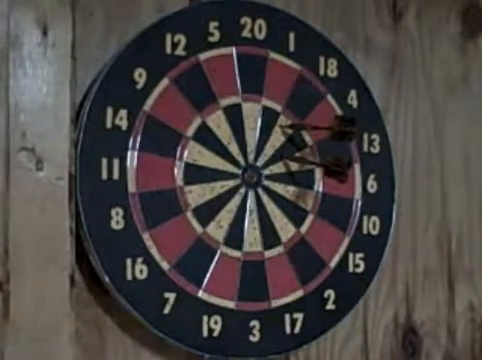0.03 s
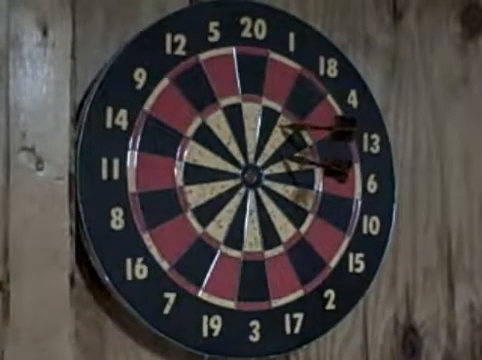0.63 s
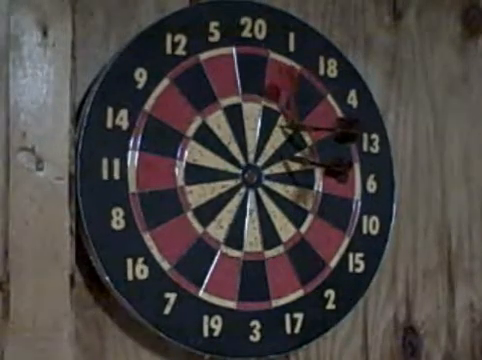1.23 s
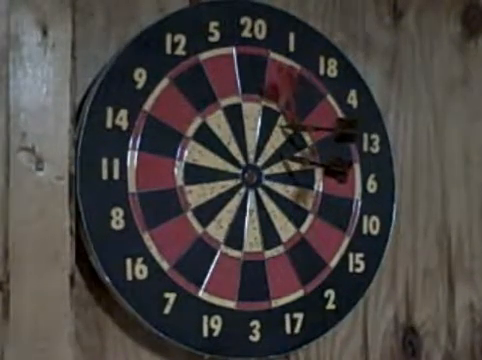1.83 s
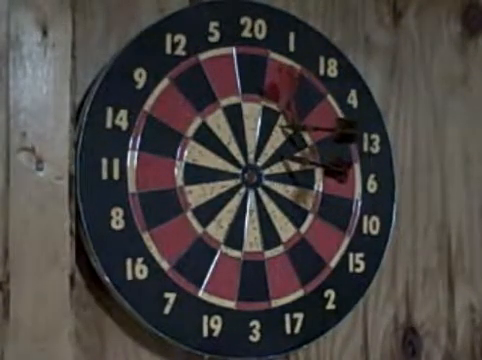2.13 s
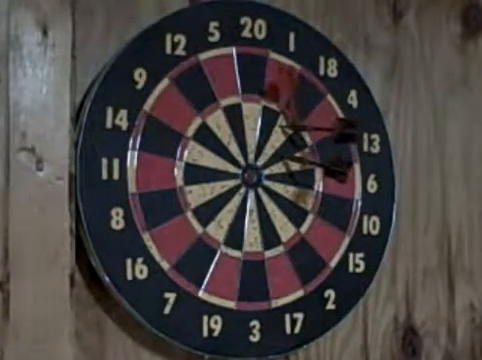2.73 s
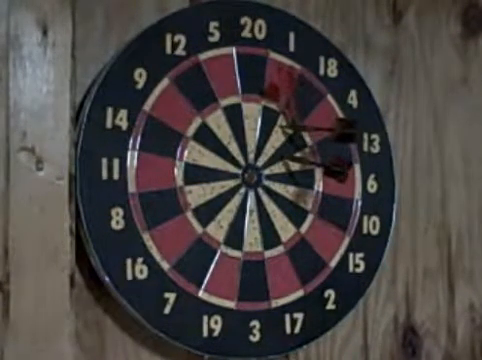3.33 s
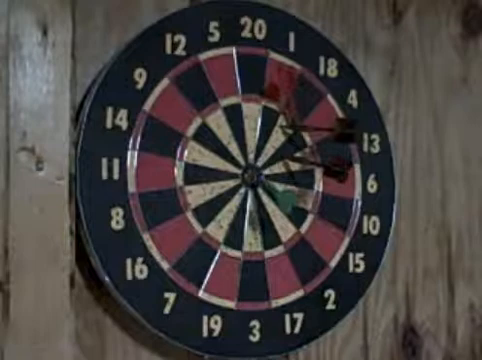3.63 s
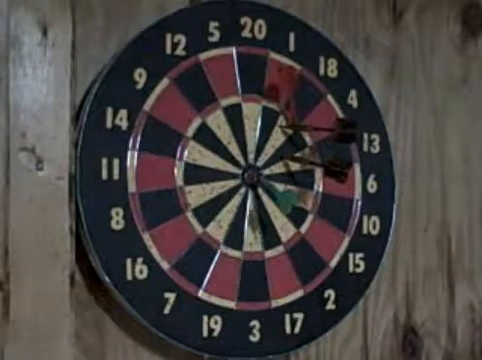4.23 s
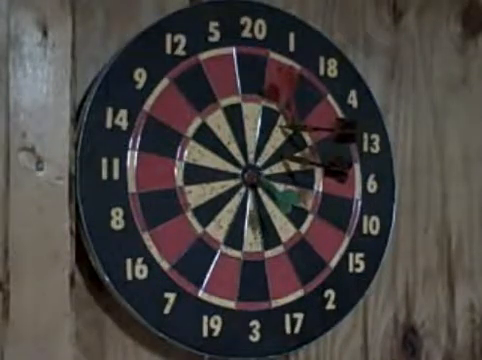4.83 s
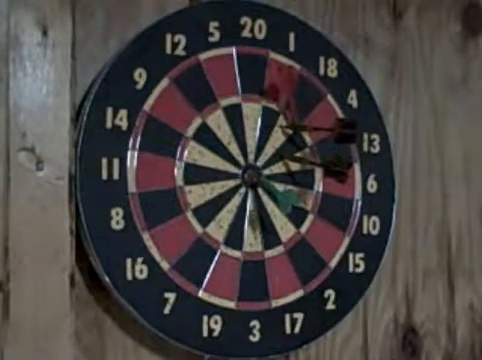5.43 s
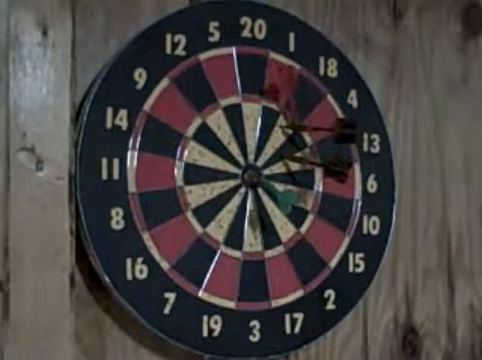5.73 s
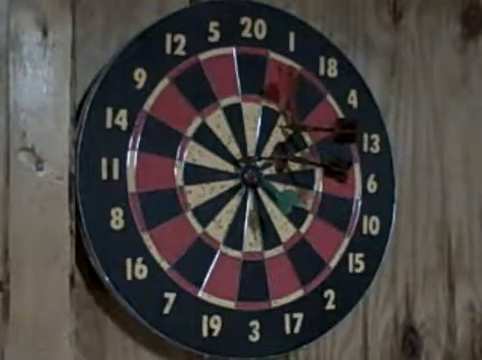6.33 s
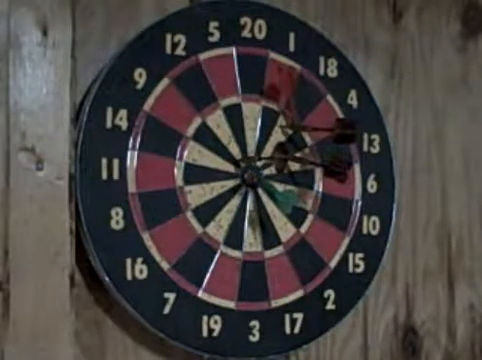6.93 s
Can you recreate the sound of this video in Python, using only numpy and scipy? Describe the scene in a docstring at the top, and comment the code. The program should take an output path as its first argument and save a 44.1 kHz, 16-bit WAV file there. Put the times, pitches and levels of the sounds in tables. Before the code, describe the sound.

Darts thunk into a board three times in a small room, clicking against other darts, while an appliance hums faintly.

```python
"""Small room, dartboard on a plank wall. Three darts strike; a faint double knock follows the last.
Each blow thuds the wall, knocks the board and shakes the dart. The first dart rattles against those
already in the board, the second grazes one and snaps sharply, the third brushes past.
Steel barrels clink, flights squeak. The thrower's sleeve rustles between throws; an appliance hums."""
import sys
import numpy as np
from scipy import signal
from scipy.fft import rfft, irfft, next_fast_len
from scipy.io import wavfile
from scipy.ndimage import map_coordinates

SR = 44100
rng = np.random.default_rng(int(sys.argv[2]) if len(sys.argv) > 2 else 0)


def to_wav(s):
    """Save 16-bit WAV."""
    ch = np.atleast_2d(s).T  # columns
    pcm = np.round(np.clip(ch, -1, 1) * 32767)  # PCM
    wavfile.write(sys.argv[1], SR, pcm.astype(np.int16))


N = 307465
T = np.arange(SR) / SR  # 1 s event time axis

# Blows: t/s, thud/dB, knock/dB, drum/dB, clatter/dB, snap/dB, knock rise/s, knock cutoff/Hz, t60 ratio
DART_BLOWS = [(1.0839, -37.5, -37.5, -28, -36, -33, 0.0008, 1000, 0.88),
              (1.0928, -33, -40, -41, -25, -27, .0008, 1500, 0.7),
              (1.101, -32, -24, -30, -37.5, -46, .0004, 699, .35),
              (3.655, -46, -37, -49, -37.5, -41, 0.0036, 2000, 0.69),
              (3.6694, -22.5, -16.5, -28.5, -25, -4.5, 0.0004, 4000, 0.8),
              (3.6918, -35.5, -23.5, -36, -31, -38, 0.00092, 2497, .4),
              (6.3690, -17, -22.5, -38.5, -33.5, -34.5, 0.0031, 696, 0.64),
              (6.3900, -31.5, -23.5, -39, -45.5, -53, 0.0012, 900, 0.46),
              (6.4290, -38, -34, -46, -50.5, -60, .003, 1110, 0.7),
              (6.8209, -51, -43, -45, -51.5, -60, 0.0006, 1000, 0.45),
              (6.8310, -52, -44.5, -45, -52.5, -60.5, 0.0009, 900, 0.54)]
# Steel on steel: t/s, ring/dB, scrape/dB, rise/s, scrape t60/s
STEEL_CONTACTS = [(1.0834, -22, -7, 0.00021, .008), (1.0863, -21.5, -15, 0.00018, .016),
                  (1.0911, -16, -7, 0.00015, .008), (1.0939, -18.5, -13, .0001, .014),
                  (1.0972, -13, -16.5, .0003, .016), (1.1045, -25, -21.5, .0005, .03),
                  (1.1095, -27.5, -20.5, .0005, .035), (1.1320, -38.5, -33, .001, .05),
                  (1.1430, -44, -34.5, 0.0005, 0.027), (1.1556, -39, -33, 0.0005, .03),
                  (1.2130, -62, -62, 0.00195, .08), (3.6595, -35.5, -31.5, 0.0016, 0.036),
                  (3.6650, -29, -30.5, 0.001, 0.033), (3.672, -26, -28.5, 0.00095, 0.038),
                  (3.7580, -55, -46, 0.0028, .05), (6.3620, -51, -44, 0.0034, 0.074),
                  (6.3800, -54, -48.5, 0.0022, 0.052), (6.425, -59, -57, .003, 0.081),
                  (6.4830, -69, -61, 0.0018, .05)]
# Flight on flight: t/s, length/s, level/dB, start f/Hz, end f/Hz, width/Hz
FLIGHT_RUBS = [(1.132, 0.036, -44, 4147, 4770, 280), (1.186, 0.06, -58, 4050, 4200, 1000),
               (3.658, .012, -45, 3850, 4000, 502), (6.366, 0.034, -52, 3880, 4160, 910)]
# Throws and reaches: t/s, rustle/dB, half-width/s, swish/dB, swish f/Hz
ARM_MOVES = [(.85, -67.5, 0.07, -70.5, 2702), (1.01, -68.5, 0.08, -68, 4800),
             (1.28, -66.5, .04, -70.5, 4500), (1.645, -69, 0.028, -59, 4500),
             (3.53, -68.5, 0.17, -76.5, 3987), (6.19, -68.5, .12, -73.5, 5214),
             (6.73, -65.5, .11, -72.5, 4200)]

# Modes: f/Hz, relative level/dB, t60/s
WALL_MODES = [(68.3, -7, 0.36), (113, -2, 0.13), (165, -1, .15), (198, -4, 0.12), (213.1, 1, 0.25),
              (236, -1.5, 0.21), (259, 2, 0.28)]
BOARD_MODES = [(324.3, -8, 0.047), (360, -1.5, 0.17), (398, -7, 0.3), (499, 0, 0.2), (549.8, -4, .2),
               (588, -1.5, 0.14), (646, -6, 0.12), (725, -4.5, 0.081), (750, -4.5, .16), (826, -1, 0.18),
               (978, -9, .2), (1148, -2, 0.11)]
BODY_MODES = [(1384, -6, 0.15), (1580, -4, .12), (1750, 0, 0.16), (1870, 3, 0.13), (2175, -1, 0.1202),
              (2400, -4, .15), (2680, 1, .18), (3348, -3.5, .16), (3612, -5.5, .14), (3965, -3, .1)]  # dart body and flight
SHAFT_MODES = [(2632, -6, 0.037), (2949, 0, 0.024), (3070, 0, 0.02), (3333, 2.5, 0.017), (3500, -1, 0.025),
               (3690, -10.5, .02)]
STEEL_MODES = [(4330, -8.5, 0.057), (4400, -6, 0.052), (5040, -15, 0.071), (5160, -11, .035),
               (5060, -14.5, 0.043), (6360, -7, .03), (6575, 2, 0.07), (6790, -6, 0.04), (7130, 0, 0.061),
               (7100, -2.5, 0.038), (7160, 0, 0.036)]  # point and barrel

# Noise spectra: f/Hz, relative density/dB
THUD_SPECTRUM = [(25, -6.5), (45, 2.5), (100, -4), (170, -1), (240, 0), (280, -5), (400, -18.5), (900, -59)]
KNOCK_SPECTRUM = [(120, -21.5), (280, -3.5), (560, -2.5), (820, -4.5), (1000, -8.5), (1300, -8),
                  (1800, -18), (3000, -24), (4500, -47), (7000, -58.5)]
CLATTER_SPECTRUM = [(500, -28), (1100, -2), (1450, 0), (1800, 3.5), (2200, 1), (2700, 0.5), (3700, -0.5),
                    (4200, -13), (5200, -15.5), (7000, -13.5), (11000, -40.5)]
SNAP_SPECTRUM = [(1200, -19.5), (2300, -10.5), (2700, 0), (3400, 0), (3800, -10), (4100, -28),
                 (7000, -32.5), (11000, -51)]
SCRAPE_SPECTRUM = [(1500, -21), (3300, -14.5), (4300, -3.5), (4700, -6.5), (5500, -5.5), (6200, -6),
                   (6900, -2), (7400, 1), (9000, 1.5), (11000, -40.5)]
CLOTH_SPECTRUM = [(300, -8.5), (900, 3.5), (2000, -0.5), (3500, -3.5), (5200, -9), (7300, -10), (9000, -29)]
AIR_SPECTRUM = [(20, -12), (29, -13), (39, 3), (58, -13), (100, -8), (135, -1), (170, -19), (250, -13.5),
                (350, -19.5), (900, -23.5), (1100, -28.5), (2000, -35.5), (3600, -38), (4600, -46),
                (7300, -48)]
HISS_SPECTRUM = [(4800, -22.5), (5300, -4), (5480, 0), (5700, -10), (6200, -27.5)]

# Appliance hum: f/Hz, rms level/dB
HUM_TONES = [(119.8, -53.5), (240, -72), (259, -73)]
# Room decay: f/Hz, t60/s
ROOM_T60 = [(80, 0.93), (125, 0.79), (200, .33), (1000, 0.32), (3000, 0.28), (7000, 0.24)]
# Treble roll-off: f/Hz, gain/dB
TREBLE_GAIN = [(7300, 0), (7480, -22), (8400, -33), (8800, -25), (9100, -40)]


def darts(drum_hz=571, drum_t60_s=0.19):
    """Point stops in the board: shaft snaps at once, heavy wall lags. A firm grip shortens the ring."""
    track = np.zeros(N)
    for at_s, thud_db, knock_db, drum_db, clatter_db, snap_db, rise_s, cutoff_hz, ratio in DART_BLOWS:
        thud = amp(thud_db) * struck(damped(WALL_MODES, ratio), THUD_SPECTRUM,
                                     ring_db=-2.5, dense_db=3.5, t60_s=0.16 * ratio, rise_s=0.007)
        knock = amp(knock_db) * struck(damped(BOARD_MODES, ratio), KNOCK_SPECTRUM,
                                       ring_db=-3, dense_db=1, t60_s=0.17 * ratio, rise_s=rise_s)
        knock = signal.lfilter(*signal.butter(1, cutoff_hz, fs=SR), knock)
        drum_fade = amp(drum_db - 60 * T / (drum_t60_s * ratio))
        drum = drum_fade * np.sin(2 * np.pi * drum_hz * T)  # board's drum mode
        clatter = amp(clatter_db) * struck(damped(BODY_MODES, ratio), CLATTER_SPECTRUM,
                                           ring_db=-8, dense_db=-2.5, t60_s=0.19 * ratio, rise_s=0.0015)
        snap = amp(snap_db) * struck(SHAFT_MODES, SNAP_SPECTRUM,
                                     ring_db=0.5, dense_db=-7.5, t60_s=0.015, rise_s=0.0009)
        impact = knock + drum + clatter
        add(track, at_s, in_room(thud, tail_db=-11, echo_db=-19, echo_s=0.095, spread_s=0.02))
        add(track, at_s, in_room(impact, tail_db=-8, echo_db=-18.5, echo_s=0.075, spread_s=0.018))
        add(track, at_s, in_room(snap, tail_db=-16, echo_db=-28.5))
    return track


def barrel_clinks(detune=0.008, max_t60_s=0.045):
    """Steel on steel: brief scrape, barrel ring. Pitch varies per touch; the board's grip caps t60."""
    track = np.zeros(N)
    for at_s, ring_db, scrape_db, rise_s, scrape_t60_s in STEEL_CONTACTS:
        pitch = 1 + rng.uniform(-detune, detune)
        modes = [(hz * pitch, db, min(t60_s, max_t60_s)) for hz, db, t60_s in STEEL_MODES]
        clink = struck(modes, SCRAPE_SPECTRUM, ring_db, scrape_db, scrape_t60_s, rise_s)
        add(track, at_s, in_room(clink, tail_db=-16, echo_db=-28, echo_s=0.06, spread_s=0.012))
    return track


def flight_squeaks():
    """Flights rub their neighbours: thin stick-slip squeak, pitch sliding with pressure."""
    track = np.zeros(N)
    for at_s, length_s, db, start_hz, end_hz, width_hz in FLIGHT_RUBS:
        progress = np.clip(T / length_s, 0, 1)
        phase = 2 * np.pi * np.cumsum(start_hz + (end_hz - start_hz) * progress) / SR
        grip = wobble(width_hz)[:SR] + 1j * wobble(width_hz)[:SR]
        swell = np.sqrt(np.abs(np.sin(np.pi * progress)))
        squeak = unit(np.real(grip * np.exp(1j * phase))) * swell
        add(track, at_s, in_room(amp(db) * squeak, tail_db=-15.5, echo_db=-33.5))
    return track


def sleeve(crease_db=1.3, band_step_oct=0.5):
    """Cloth rustles, uneven as creases slip. Each arm move swishes at its own pitch."""
    t = np.arange(N) / SR
    cloth, track = noise(CLOTH_SPECTRUM, N), np.zeros(N)
    for at_s, rustle_db, half_width_s, swish_db, swish_hz in ARM_MOVES:
        band = [(swish_hz * 2 ** (k * band_step_oct), -4 * k * k) for k in range(-4, 5)]
        swell = 1 / (1 + ((t - at_s) / half_width_s) ** 2)
        track += swell * (amp(rustle_db) * cloth + amp(swish_db) * noise(band, N))
    return track * amp(crease_db * wobble(70))


def background():
    """Wavering mains hum, rumble of moving air, thin hiss."""
    t = np.arange(N) / SR
    hum = np.zeros(N)
    for hz, db in HUM_TONES:
        peak = np.sqrt(2) * amp(db + 1.91 * wobble(6))
        hum += peak * np.sin(2 * np.pi * hz * t + 0.4 * wobble(6.5))
    air = amp(-51.5 + 0.25 * wobble(6.4)) * noise(AIR_SPECTRUM, N)
    hiss = amp(-82.5) * noise(HISS_SPECTRUM, N)
    return hum + air + hiss


def struck(modes, spectrum, ring_db, dense_db, t60_s, rise_s):
    """Struck part: clear modes at random strengths, plus dense modes as noise decaying over t60_s."""
    hz, db, mode_t60_s = np.transpose(modes)[:, :, None]
    gains = unit(amp(db + rng.normal(0, 2, db.shape))) / np.sqrt(len(modes))
    signs = (-1) ** np.arange(len(modes))[:, None]  # neighbours in antiphase
    onset = 1 - np.exp(-T / rise_s)
    partials = signs * gains * amp(-60 * T / mode_t60_s) * np.sin(2 * np.pi * hz * T)
    ring = onset * np.sum(partials, axis=0)
    fade = onset * amp(-60 * T / t60_s)
    dense = unit(noise(spectrum, SR) * fade) * np.std(fade)
    return amp(ring_db) * ring + amp(dense_db) * dense


def damped(modes, ratio):
    """Modes with t60 scaled by ratio."""
    return [(hz, db, t60_s * ratio) for hz, db, t60_s in modes]


def in_room(sound, tail_db, echo_db, echo_s=0.04, spread_s=0.017):
    """Direct sound, diffuse tail and far-wall echo cluster."""
    hz, t, bins = signal.stft(rng.standard_normal(SR), SR, nperseg=256)
    decay = amp(-60 * t / along(ROOM_T60, hz)[:, None])
    tail_ir = signal.istft(bins * decay, SR, nperseg=256)[1][:SR]
    tail_ir *= 1 - np.exp(-T / 0.006)
    echo_ir = rng.standard_normal(SR) * np.exp(-0.5 * ((T - echo_s) / spread_s) ** 2)
    tail, echo = (unit(signal.fftconvolve(sound, ir)[:SR]) for ir in (tail_ir, echo_ir))
    return sound + np.std(sound) * (amp(tail_db) * tail + amp(echo_db) * echo)


def noise(spectrum, size):
    """Coloured noise, rms 1."""
    n_fft = next_fast_len(size)
    gain = amp(along(spectrum, np.fft.rfftfreq(n_fft, 1 / SR)))
    return unit(irfft(rfft(rng.standard_normal(n_fft)) * gain, n_fft)[:size])


def wobble(rate_hz):
    """Smooth random curve, knots at rate_hz."""
    knots = rng.standard_normal(int(N * rate_hz / SR) + 4)
    return map_coordinates(knots, [np.arange(N) * rate_hz / SR])


def along(points, hz):
    """Interpolate (f/Hz, value) points over log f."""
    knots_hz, values = np.transpose(points)
    return np.interp(np.log(hz + 1), np.log(knots_hz), values)


def amp(db):
    """dB to gain."""
    return 10 ** (np.asarray(db) / 20)


def unit(x):
    """Scale to rms 1."""
    return x / np.sqrt(np.mean(x ** 2) + 1e-20)


def add(track, at_s, sound):
    """Mix sound into track at at_s."""
    part = track[round(at_s * SR):][:len(sound)]
    part += sound[:len(part)]


def scene():
    """Mono sum near the board."""
    return (darts() + barrel_clinks() + flight_squeaks() + sleeve() + background())[None]


def record(dry):
    """Treble roll-off, hard band limit."""
    limit_hz = 9100
    n_fft = next_fast_len(N + SR)
    hz = np.fft.rfftfreq(n_fft, 1 / SR)
    gain = amp(along(TREBLE_GAIN, hz)) * (hz < limit_hz)
    return irfft(rfft(dry, n_fft) * gain, n_fft)[:, :N]


dry = scene()
out = record(dry)
to_wav(out)
```